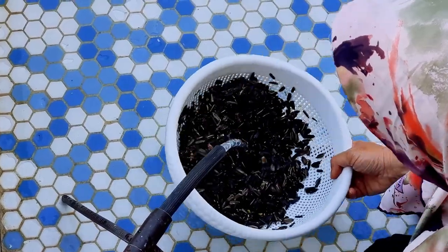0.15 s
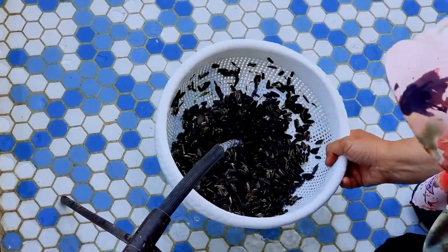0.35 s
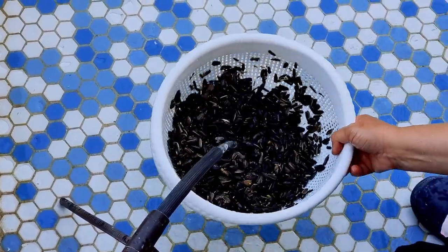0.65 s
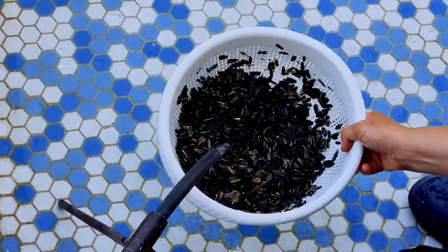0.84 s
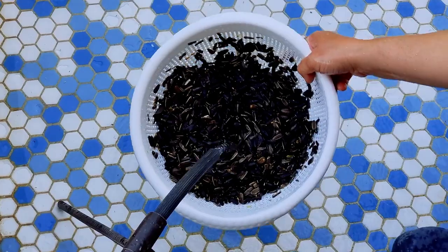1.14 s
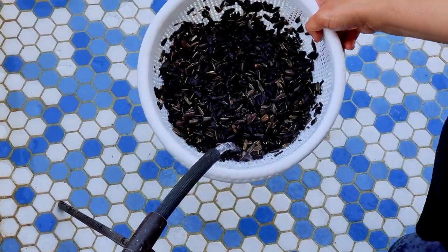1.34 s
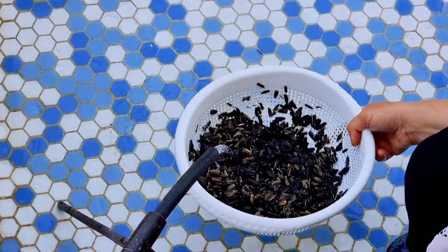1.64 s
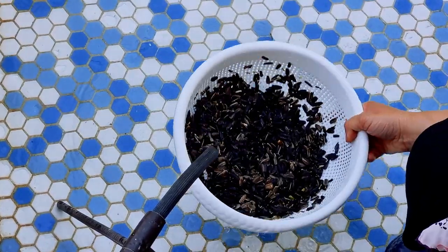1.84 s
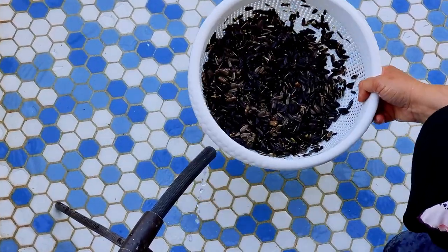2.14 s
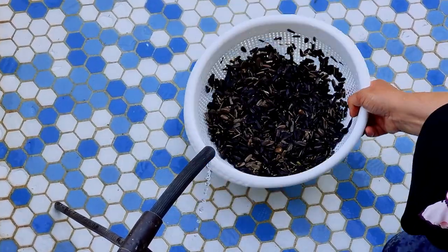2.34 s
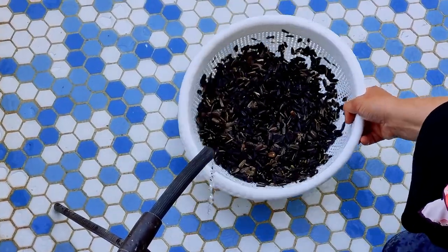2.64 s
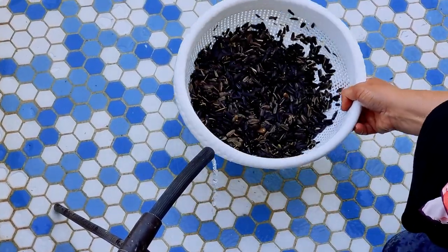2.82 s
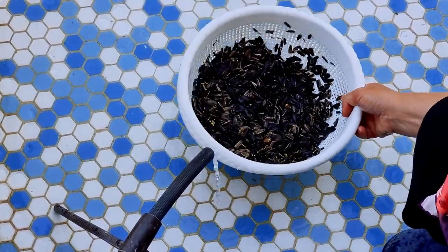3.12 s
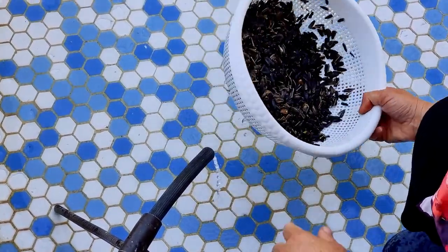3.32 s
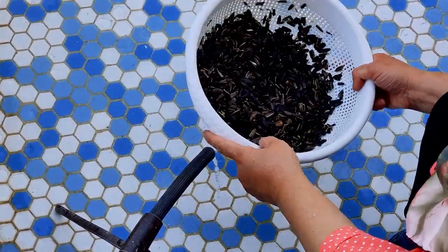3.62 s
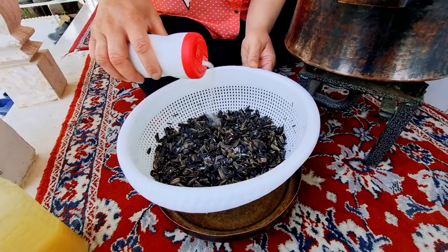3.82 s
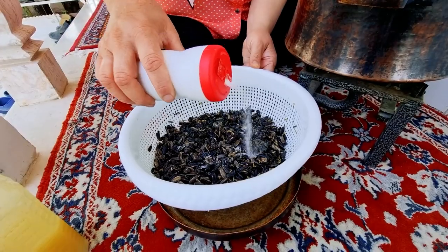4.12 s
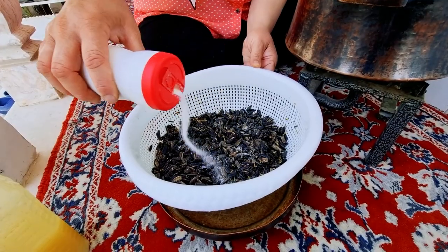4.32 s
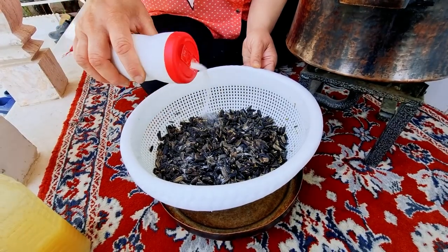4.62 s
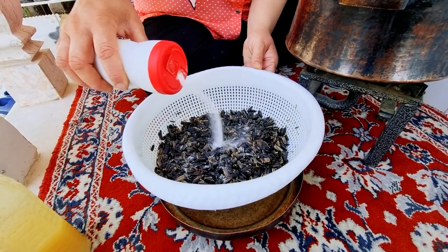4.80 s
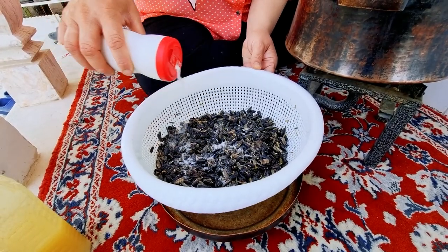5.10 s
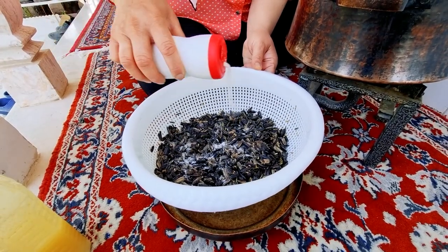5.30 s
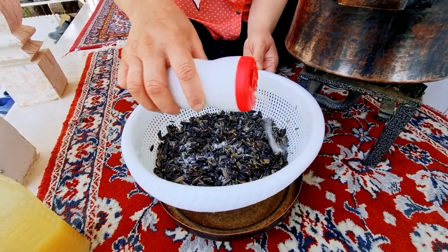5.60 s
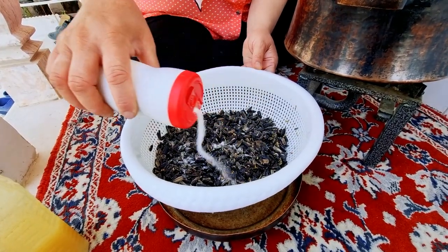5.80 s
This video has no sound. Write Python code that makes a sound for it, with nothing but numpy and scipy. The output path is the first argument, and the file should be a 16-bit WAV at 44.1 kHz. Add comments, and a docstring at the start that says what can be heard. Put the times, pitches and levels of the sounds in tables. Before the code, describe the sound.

Hose water patters and gurgles over scraping wet seeds, thins to drips, three slaps ring out, then a bubbling copper pot knocks indoors over burner hiss.

```python
"""In a tiled yard, seeds are rinsed in a plastic colander under a garden hose: water patters as random drops,
wet seeds slide as dense scraping clicks, and gliding bubble notes gurgle. The flow thins to a drip and
picks up at the end; three slaps on the colander are blows with a ringing body and wall echoes.
After a short silence, indoors: salt is shaken over the seeds in showers of clicks while a big copper pot
heats towards the boil, its collapsing steam bubbles knocking the ringing wall, over a steady burner hiss."""
import sys
import numpy as np
from scipy import signal
from scipy.fft import rfft, irfft
from scipy.io import wavfile
from scipy.ndimage import uniform_filter1d

SR = 44100
rng = np.random.default_rng(int(sys.argv[2]) if len(sys.argv) > 2 else 0)


def persist_wave(psi):
    """Save psi, clipped to +-1, as 16-bit WAV."""
    counts = np.round(np.clip(psi, -1, 1) * 32767).astype(np.int16)
    wavfile.write(sys.argv[1], SR, np.atleast_2d(counts).T)


N = 262395
TIME = np.arange(N) / SR
YARD_END_S, KITCHEN_START_S = 3.749, 3.819

# Strength of the simmer, swelling and easing. Each row: time in seconds, level in dB.
SIMMER = [(3.82, -38), (4.3, -38.5), (4.56, -31), (4.8, -36), (4.95, -33), (5.08, -36.5), (5.19, -35),
          (5.32, -37.5), (5.55, -33), (5.76, -35), (5.95, -36)]
# Tone of the bubbles collapsing in the pot. Each row: frequency in Hz, relative level in dB per Hz.
POT_TONE = [(60, -27), (200, 8.5), (330, 2), (650, -8.5), (1150, 3.5), (1750, 5.5), (2400, -2.5),
            (3100, -9), (4500, -13.5), (8000, -11), (16000, -55)]


def amp(db):
    """Decibels to gain."""
    return 10 ** (np.asarray(db) / 20)


def unit(x):
    """Scales to an rms of one."""
    return x / np.sqrt(np.mean(x ** 2) + 1e-20)


def read(points, hz):
    """A table's value, interpolated on a log-frequency axis."""
    f, value = np.transpose(points)
    return np.interp(np.log(hz + 1), np.log(f + 1), value)


def level(rows, axis=1):
    """A dB column of a curve as gain at each sample."""
    rows = np.array(rows)
    return amp(np.interp(TIME, rows[:, 0], rows[:, axis]))


def add(mix, s, sound):
    """Mixes a sound in at time s."""
    part = mix[max(round(s * SR), 0):][:len(sound)]
    part += sound[:len(part)]


def colour(x, spectrum):
    """Filters a full-length sound by a spectrum in dB and scales it to rms one."""
    hz = np.fft.rfftfreq(N, 1 / SR)
    return unit(irfft(rfft(x) * amp(read(spectrum, hz)), N))


def pulse(db_of_hz, size=2048):
    """The sharpest causal (minimum-phase) click with a given spectrum, at energy one."""
    hz = abs(np.fft.fftfreq(size, 1 / SR)) + 1
    log_gain = np.log(amp(np.maximum(db_of_hz(hz), -90)))
    minimum_phase = np.exp(np.conj(signal.hilbert(log_gain)))
    click = np.fft.ifft(minimum_phase).real[:size // 2]
    return click / np.linalg.norm(click)


def hump(hz, centre_hz, octaves):
    """A broad resonance, in dB."""
    return -20 * np.log10(1 + (np.log2(hz / centre_hz) / octaves) ** 2)


def patter(per_s, spread_db):
    """Random clicks of either sign, most small, a few large."""
    size = amp(spread_db * np.minimum(rng.exponential(1, N), 4))
    return size * rng.choice([-1, 1], N) * (rng.random(N) < per_s / SR)


def droplets(per_s, spread_db, low_hz, high_hz, cycles, count=32, size=1500):
    """A shower of tiny drops or bubbles, each swelling and ringing for a few cycles at one of many pitches."""
    t, out = np.arange(size) / SR, np.zeros(N)
    for hz in np.geomspace(low_hz, high_hz, count):
        age = t * hz / cycles
        grain = hz * np.sqrt(age) * np.exp(-age) * np.sin(2 * np.pi * hz * t)
        out += signal.oaconvolve(patter(per_s / count, spread_db), grain)[:N]
    return out


def scatter(decay_s, share_db, rise_s=0, size=4096):
    """A blow, then a clatter of reflections that builds up and quickly dies; share_db is clatter over blow."""
    t = np.arange(size) / SR
    tail = rng.standard_normal(size) * np.exp(-t / decay_s) * (1 - np.exp(-t / (rise_s + 1 / SR)))
    tail *= amp(share_db) / np.linalg.norm(tail)
    tail[0] = 1
    return tail


def blow(click, decay_s, share_db, rise_s=0):
    """A click and its clatter, at rms one when its energy is spread over 20 ms."""
    sound = signal.fftconvolve(click, scatter(decay_s, share_db, rise_s))
    return sound / np.linalg.norm(sound) * np.sqrt(.02 * SR)


def ring(modes, size=16384):
    """Damped sines of a struck body, from rows of (Hz, dB, t60 in seconds)."""
    t = np.arange(size) / SR
    return sum(amp(db - 60 * t / t60) * np.sin(2 * np.pi * hz * t) for hz, db, t60 in modes)


def echo(x, t60s, size=16384):
    """Diffuse reflections at energy one, each band of noise dying at its own speed."""
    hz, t, bands = signal.stft(rng.standard_normal(size), SR, nperseg=256)
    decay = amp(-60 * t / read(t60s, hz)[:, None])
    tail = signal.istft(bands * decay, SR, nperseg=256)[1]
    tail *= np.minimum(np.arange(len(tail)) / SR / 0.0021, 1) ** 2  # fades in over 2.1 ms
    return signal.fftconvolve(x, tail / np.linalg.norm(tail))[:N]


def swells(rows, stretch=1, peak=0.6):
    """Smooth rises and falls of gain from rows of (s at the height, dB, length s); peak is the rising share."""
    out = np.zeros(N)
    for s, db, length in rows:
        span = stretch * length
        phase = np.interp(TIME, [s - peak * span, s, s + (1 - peak) * span], [0, np.pi / 2, 0])
        out += amp(db) * np.sin(phase) ** 2
    return out


def air():
    """Quiet outdoor air as coloured noise, with a distant wavering hum of noise through narrow resonances."""
    # Tone of the yard air. Each row: frequency in Hz, relative level in dB per Hz.
    air_tone = [(25, -17), (50, 9.5), (80, 9), (130, 4), (210, -9), (330, 0), (600, -7), (1000, -13),
                (1800, -6), (3300, -13), (7000, -8), (16000, -18)]
    # Distant hum. Each row: frequency in Hz, width in Hz, level in dB.
    hum_bands = [(84.6, 8, -68.5), (202, 30, -62)]
    hz = np.fft.rfftfreq(N, 1 / SR)
    hum = np.zeros(N)
    for centre_hz, width_hz, db in hum_bands:
        resonance = 1 + (2 * (hz - centre_hz) / width_hz) ** 2
        hum += amp(db) * unit(irfft(rfft(rng.standard_normal(N)) / resonance, N))
    return amp(-52.5) * colour(rng.standard_normal(N), air_tone) + hum


def water():
    """Water on seeds and tiles: mist, ticking drops and stray drops over a duller splash, on one flow curve."""
    # The flow as it thins and returns. Each row: time in seconds, spray level in dB, splash level in dB.
    flow = [(0, -33.5, -43.5), (.17, -40.5, -50.5), (.32, -33, -47.5), (.8, -39, -52), (.92, -42.5, -54),
            (1.12, -38.5, -50.5), (1.38, -41, -51), (1.6, -45.5, -53), (1.65, -38.5, -47),
            (1.73, -40.5, -45.5), (1.8, -34, -47), (1.87, -40.5, -50), (1.99, -38, -54),
            (2.04, -45.5, -52.5), (2.4, -51, -57.5), (3.3, -54.5, -54), (3.66, -44.5, -51.5),
            (3.74, -43, -47.5)]
    # Tone of the bright spray. Each row: frequency in Hz, filter level in dB.
    spray_tone = [(1500, -12), (3500, -6), (5200, -7.5), (6900, -3.5), (9000, -4.5), (12000, -8),
                  (14500, -2.5), (16000, -6)]
    # Tone of the dull splash. Each row: frequency in Hz, filter level in dB.
    splash_tone = [(100, -30), (220, 8), (450, 6.5), (1000, 6.5), (2300, 5.5), (4000, -3.5), (8000, -19)]
    mist = colour(patter(per_s=9000, spread_db=3), spray_tone)

    ticks = droplets(per_s=600, spread_db=4.2, low_hz=3000, high_hz=15500, cycles=2)
    ticks = signal.fftconvolve(ticks, scatter(decay_s=0.0027, share_db=7))[:N]
    ticks = colour(ticks, spray_tone)

    strays = droplets(per_s=22, spread_db=5.0, low_hz=5920, high_hz=14500, cycles=0.68)
    strays = signal.fftconvolve(strays, scatter(decay_s=0.003, share_db=9))[:N]
    strays = colour(strays, spray_tone)

    splash = droplets(per_s=1300, spread_db=2.5, low_hz=245.3, high_hz=4976, cycles=5.4)
    splash = colour(splash, splash_tone)
    spray = unit(mist + amp(1) * ticks + amp(-3) * strays)
    return level(flow) * spray + level(flow, axis=2) * splash


def seeds():
    """Thousands of husks scrape past one another in each slide, the larger ones catching with a short crunch."""
    # The wet heap slides as the colander tips. Each row: height of the slide in seconds, level in dB,
    # length in seconds.
    slide_rows = [(.25, -32.5, 0.072), (.396, -23, .11), (.503, -25, 0.1), (.59, -44, .06),
                  (.742, -30, .12), (.85, -39, 0.06), (.962, -36.5, 0.085)]
    # Tone of the husks. Each row: frequency in Hz, filter level in dB.
    husk_tone = [(120, -70), (200, -52), (482, -18), (569, -9.5), (709, -19), (950, -6), (1060, -12.5),
                 (1500, -4), (1910, -7), (2170, 0), (3430, -7.5), (7410, -11.5), (16000, -22)]
    scrape = patter(per_s=8000, spread_db=2.4)
    crunch = droplets(per_s=700, spread_db=2.5, low_hz=900, high_hz=9000, cycles=2)
    sliding = swells(slide_rows, peak=0.51)
    # loose seeds stir around each slide, softer and longer
    stirring = amp(-19) * swells(slide_rows, stretch=6.6)
    texture = unit(colour(scrape, husk_tone) + amp(2.0) * colour(crunch, husk_tone))
    return np.hypot(sliding, stirring) * texture


def drops():
    """Large drops burst on plastic and tile with a short bright snap: a resonant click and its clatter."""
    # The largest drops. Each row: start in seconds, peak level in dB, centre frequency in Hz.
    drop_rows = [(.005, -19, 6450), (0.0916, -26.5, 7800), (0.32, -15, 8550), (0.333, -14.5, 9000),
                 (.476, -17.5, 2940), (.589, -19.5, 3800), (0.7262, -18.5, 4800), (.7907, -17, 8500),
                 (.834, -12.5, 7300), (1.0192, -25, 7700), (1.2258, -14.5, 6660), (1.261, -21, 7100),
                 (1.344, -19.5, 7400), (1.953, -26, 4160), (2.0565, -19, 7160), (2.1168, -22, 6350),
                 (2.2838, -23.5, 14700), (2.52, -19, 12500), (2.521, -30.5, 696), (3.384, -31, 13000),
                 (3.627, -21, 4700)]
    out = np.zeros(N)
    for s, db, hz in drop_rows:
        burst = scatter(decay_s=.002, share_db=16)
        snap = signal.fftconvolve(pulse(lambda f: hump(f, hz, octaves=0.39)), burst)
        add(out, s, amp(db) * snap / abs(snap).max())
    return out


def bubble(start_hz, glide, length):
    """A bubble's note glides faster and faster as it nears the surface; the churning water roughens it."""
    wobble_depth, flutter_depth = .045, .35  # rms shares of pitch and of loudness
    u = np.arange(0, 1, 1 / (length * SR))
    slow_noise = uniform_filter1d(rng.standard_normal((2, SR)), size=60)
    wobble, flutter = unit(slow_noise)[:, :len(u)]
    hz = start_hz * glide ** (u ** 1.39) * (1 + wobble_depth * wobble)
    swell = signal.windows.tukey(len(u), .5) * (1 + flutter_depth * flutter)
    return swell * np.sin(2 * np.pi * np.cumsum(hz) / SR)


def bubbles():
    """Air glugs in the hose mouth, one gulp falls in pitch, and small bubbles plink in the puddle."""
    # Glugs, all on the same rising note. Each row: start in seconds, level in dB, length in seconds.
    glug_rows = [(0.099, -44.5, 0.028), (1.376, -41.5, 0.047), (1.516, -38, 0.05), (1.67, -37, 0.033),
                 (1.816, -36.5, 0.05), (2.055, -39.5, 0.0246), (3.57, -48.5, 0.026), (3.709, -40, 0.045)]
    # Small bubbles in the puddle. Each row: start in seconds, level in dB, starting pitch in Hz.
    plink_rows = [(1.805, -40.5, 2970), (1.862, -42, 3300), (1.872, -41, 2320), (1.987, -42, 2620),
                  (2.076, -43.5, 2700), (2.232, -45.5, 5450), (2.976, -49, 950), (3.041, -49, 5500),
                  (3.064, -47, 3120), (3.338, -46, 924), (3.624, -44.5, 4520), (3.7, -40.5, 2180)]
    out = np.zeros(N)
    # glide is end pitch over start pitch
    for s, db, length in glug_rows:
        add(out, s, amp(db) * bubble(start_hz=984, glide=1.62, length=length))
    # one low, falling gulp as the flow breaks
    add(out, 1.654, amp(-41.5) * bubble(start_hz=724, glide=0.35, length=0.0226))
    for s, db, hz in plink_rows:
        add(out, s, amp(db) * bubble(hz, glide=1.06, length=.023))
    return out


def slaps():
    """A sharp smack with the seeds rattling, the thud of the loaded plastic, and the smack's echoes."""
    # Slaps on the colander. Each row: start in seconds, level in dB (smack energy spread over 20 ms),
    # treble tilt in dB per octave.
    slap_rows = [(2.4356, -18.5, 0.1), (2.7786, -17.5, 1.5), (3.136, -16.5, 2)]
    # Tone of the smack. Each row: frequency in Hz, relative level in dB per Hz.
    smack_tone = [(30, -32), (150, -8), (250, -12.5), (450, -7), (750, -8), (1150, 0), (1650, 1),
                  (2100, -1), (2650, -6), (3300, -5), (5000, -14), (7500, -14.5), (11000, -25),
                  (16000, -24.5)]
    # Ring of the loaded plastic. Each row: frequency in Hz, relative level in dB, t60 in seconds.
    plastic_modes = [(87, -9, 0.18), (187, -9.5, 0.076), (347, -3.5, 0.018), (593, -11, 0.082),
                     (1127, 1.5, 0.029), (1330, -13, 0.07), (1720, -15.5, 0.11), (1840, -24, 0.16),
                     (2670, 5, 0.032), (2700, -5, 0.042), (3950, -7.5, 0.04)]
    # Echoes from the floor and walls of the yard. Each row: delay in seconds, relative level in dB.
    wall_rows = [(0.0108, -8), (.026, -19.5), (.038, -17), (0.06, -23.5)]
    out, body = np.zeros(N), ring(plastic_modes)
    for s, db, tilt_db in slap_rows:
        click = pulse(lambda f: read(smack_tone, f) + tilt_db * np.log2(f / 2000))
        add(out, s, amp(db) * blow(click, decay_s=0.0084, share_db=12.5))
        add(out, s, amp(db) * body)
        for delay, wall_db in wall_rows:
            add(out, s + delay, amp(db + wall_db) * blow(click, decay_s=0.01, share_db=11.5))
    return out


def burner():
    """The flame's low flutter and fine, slightly grainy hiss from dense clicks; it sets the pot droning."""
    # Tone of the flame. Each row: frequency in Hz, relative level in dB per Hz.
    flame_tone = [(25, -22), (60, -2.5), (95, 1.5), (140, -2), (210, 9), (300, 2), (600, -6.5),
                  (1500, -19.5), (4000, -15.5), (9000, -20), (11000, -23.5), (16000, -21.5)]
    flame = colour(patter(per_s=9000, spread_db=2.5), flame_tone)
    drone = unit(signal.fftconvolve(flame, ring([(237.0, 0, 0.1)]))[:N])
    return amp(-36.5) * flame + amp(-52) * drone


def simmer(count=28):
    """Countless small collapses, each a short round blip at one of many pitches."""
    small = np.zeros(N)
    for hz in np.geomspace(300, 4000, count):
        cavity = pulse(lambda f: hump(f, hz, octaves=.25))
        blip = blow(cavity, decay_s=.0035, share_db=13, rise_s=.002)
        small += signal.oaconvolve(patter(per_s=10, spread_db=2.5), blip)[:N] * hz ** .75
    return level(SIMMER) * colour(small, POT_TONE)


def knock(db, hz):
    """One steam bubble collapses: the stronger it is, the narrower its band and the clearer its pitch."""
    # 0.41 octaves at -20.5 dB, twice as wide for each 2.5 dB weaker, up to 0.84
    octaves = min(0.41 * 2 ** ((-20.5 - db) / 2.5), 0.84)
    click = pulse(lambda f: read(POT_TONE, f) + hump(f, hz, octaves))
    # the cavity rebounds for a few cycles at its own pitch
    rebound = ring([(hz, 0, .016)], size=1024)
    click = click + amp(-10) * rebound / np.linalg.norm(rebound)
    # the water cushions the onset of the pot's brief clatter
    return amp(db) * blow(click, decay_s=0.0072, share_db=10.5, rise_s=.0007)


def lesser_knocks(count=80):
    """Rows of (s, dB, Hz) for further collapses at uneven intervals, their levels following the simmer."""
    per_s, spread_db = 22, 2.7
    typical_hz, spread_octaves = 1450, 0.8
    late, strength, pitch = rng.standard_normal((count, 3)).clip(-2, 2).T
    times = KITCHEN_START_S + (np.arange(count) + 1 + .4 * late) / per_s
    dbs = np.interp(times, *np.transpose(SIMMER)) + spread_db * strength
    return list(zip(times, dbs, typical_hz * 2 ** (spread_octaves * pitch)))


def pot():
    """Steam bubbles collapse on the hot base: big ones thud, small ones tick, all ring the copper."""
    # The largest collapses. Each row: start in seconds, level in dB, centre frequency in Hz.
    knock_rows = [(3.821, -33, 670), (3.845, -29, 2300), (3.951, -30, 690), (4.028, -30, 684),
                  (4.13, -25, 674), (4.175, -33.5, 2500), (4.209, -32.5, 1050), (4.223, -26, 1680),
                  (4.241, -32, 536), (4.359, -25.5, 1600), (4.376, -28, 1800), (4.436, -25, 1090),
                  (4.443, -26, 537), (4.487, -30.5, 736), (4.511, -29.5, 1430), (4.532, -23, 685),
                  (4.548, -25.5, 640), (4.627, -29, 1230), (4.659, -32, 1610), (4.673, -27.5, 1840),
                  (4.71, -29, 2070), (4.73, -25.5, 920), (4.752, -25.5, 1260), (4.826, -27, 2330),
                  (4.91, -27.5, 1720), (4.936, -29, 1050), (4.989, -25.5, 1100), (5.109, -32, 990),
                  (5.128, -22, 940), (5.186, -28, 784), (5.199, -27.5, 700), (5.231, -27, 620),
                  (5.251, -28.5, 1030), (5.302, -31, 573), (5.37, -29.5, 626), (5.403, -23.5, 890),
                  (5.457, -28, 1180), (5.476, -26, 1820), (5.49, -25, 1590), (5.503, -27, 1030),
                  (5.521, -21, 1830), (5.619, -23, 675), (5.671, -27.5, 1880), (5.708, -29, 805),
                  (5.857, -30.5, 1090), (5.922, -26.5, 2320), (5.935, -27.5, 990)]
    # Ring of the copper wall. Each row: frequency in Hz, relative level in dB, t60 in seconds.
    copper_modes = [(225.3, -10, 0.34), (494.6, 4.5, 0.2), (806, -32, .12), (945, 6.5, 0.13),
                    (1110, 3.5, 0.018), (1188, 7.5, 0.029), (1320, -2.5, 0.096), (1755, -3.5, 0.073),
                    (1946, -30.5, 0.051), (2350, -5.5, 0.4), (3100, -41, .1), (4460, -33, .1)]
    blows = simmer()
    for s, db, hz in knock_rows + lesser_knocks():
        add(blows, s, knock(db, hz))
    wall = unit(signal.fftconvolve(blows, ring(copper_modes))[:N]) * np.std(blows)
    room = echo(blows, [(200, 0.67), (4000, 0.062)])  # (Hz, t60 in seconds)
    return blows + amp(-5.5) * wall + amp(-19) * room


def salt():
    """Each shake drops a short shower of fine crystals, as bright clicks, over a thin steady trickle."""
    # Salt landing on the seeds. Each row: height of the shower in seconds, level in dB, length in seconds.
    shake_rows = [(3.946, -46, .025), (4.361, -39, 0.016), (4.618, -47, 0.055), (4.899, -44, .04),
                  (5.205, -42, 0.013), (5.579, -44, .073), (5.71, -44, 0.045), (5.855, -51, 0.12)]
    crystals = patter(per_s=3800, spread_db=1.5)
    showers = swells(shake_rows) + amp(-54.5)  # the constant is the trickle
    # tone: (Hz, dB per Hz)
    return showers * colour(crystals, [(1500, -13), (4000, -20), (8500, 2.5), (11500, 3.5), (15000, -2)])


def scene():
    """First the yard with its diffuse echo, a short silence, then the kitchen."""
    # Echo of the tiled yard. Each row: frequency in Hz, t60 in seconds.
    yard_t60s = [(100, 0.049), (600, 0.24), (1700, 0.24), (3000, 0.24), (5000, 0.26), (14000, 0.07)]
    near = water() + seeds() + drops() + bubbles()
    hits = slaps()
    yard = near + amp(-15.5) * echo(near, yard_t60s)
    yard += hits + amp(-15.5) * echo(hits, yard_t60s) + air()
    kitchen = pot() + burner() + salt()
    return (yard * (TIME < YARD_END_S) + kitchen * (TIME > KITCHEN_START_S))[None]


def record(dry):
    """The microphone sheds bass below 54 Hz, peaks clip at full scale; then a 16 kHz band limit."""
    lean = signal.sosfilt(signal.butter(4, 54, "high", fs=SR, output="sos"), dry)
    low_pass = signal.firwin(511, 16000, window=("kaiser", 9), fs=SR)
    return signal.oaconvolve(np.clip(lean, -1, 1), low_pass[None], "same")


dry = scene()
out = record(dry)
persist_wave(out)
```